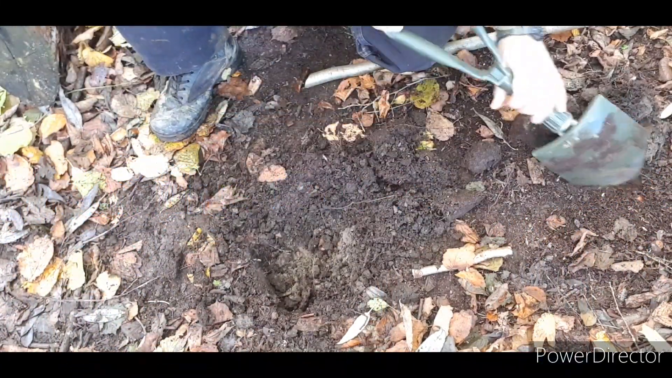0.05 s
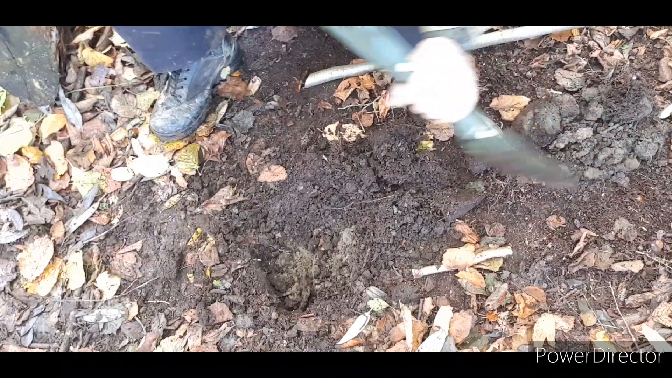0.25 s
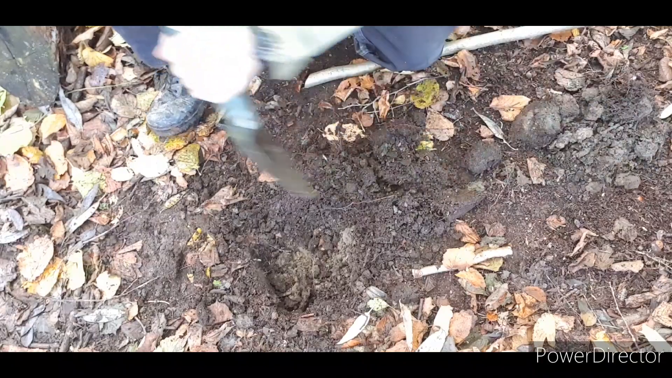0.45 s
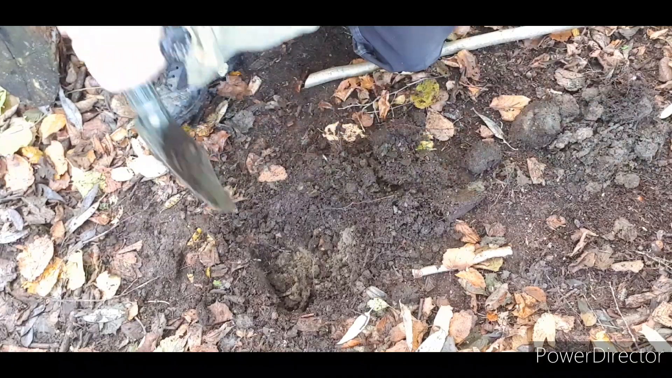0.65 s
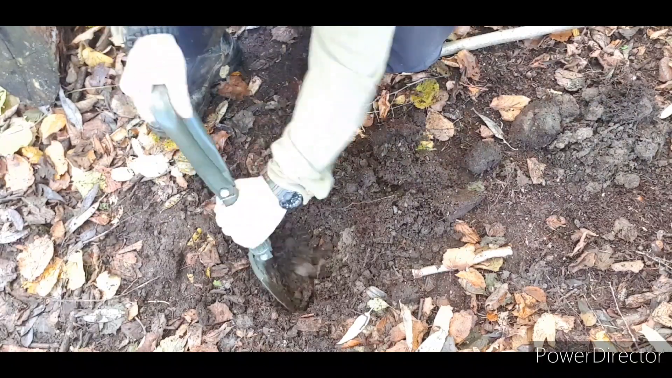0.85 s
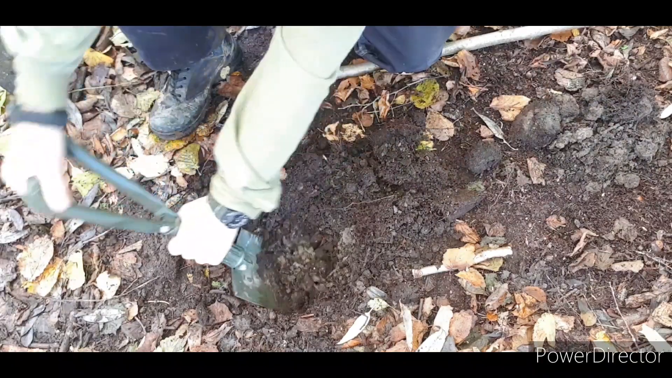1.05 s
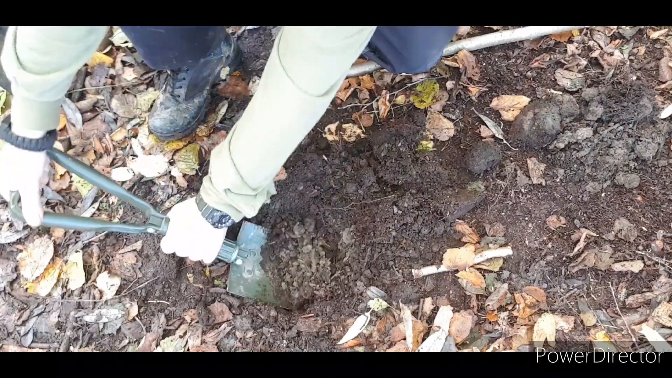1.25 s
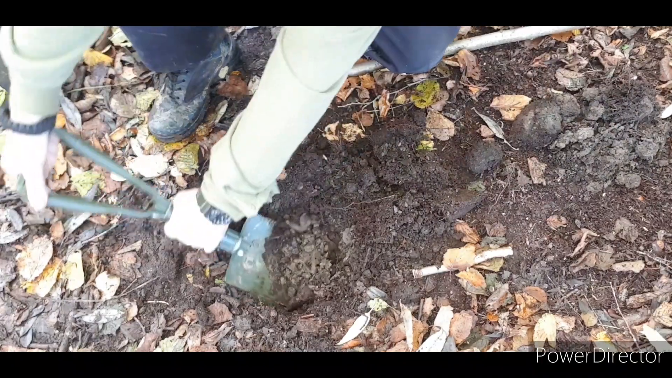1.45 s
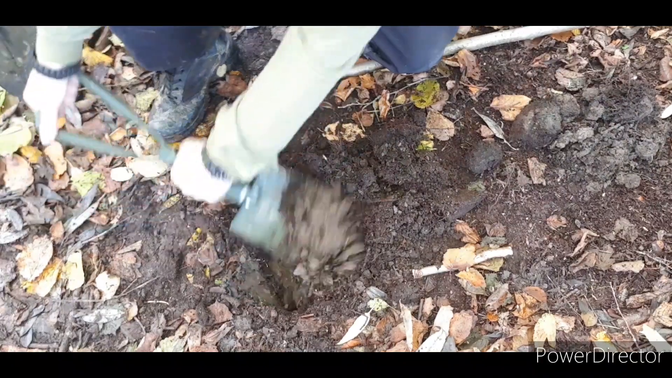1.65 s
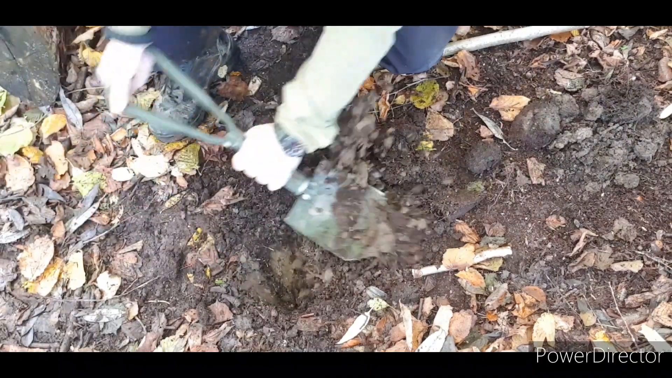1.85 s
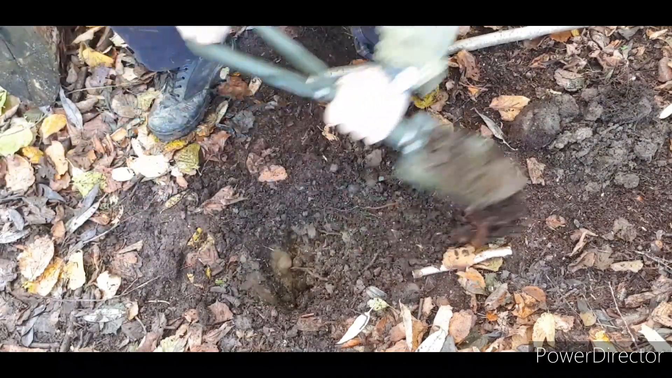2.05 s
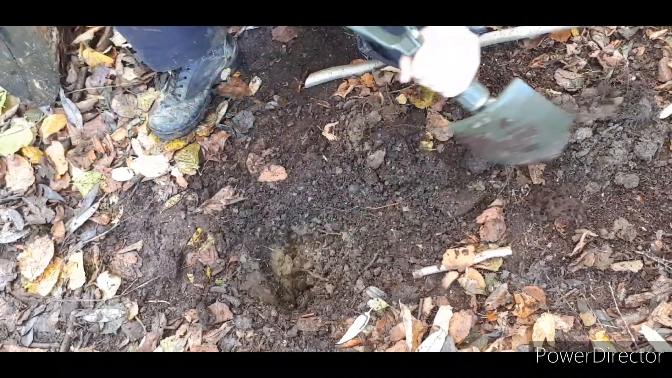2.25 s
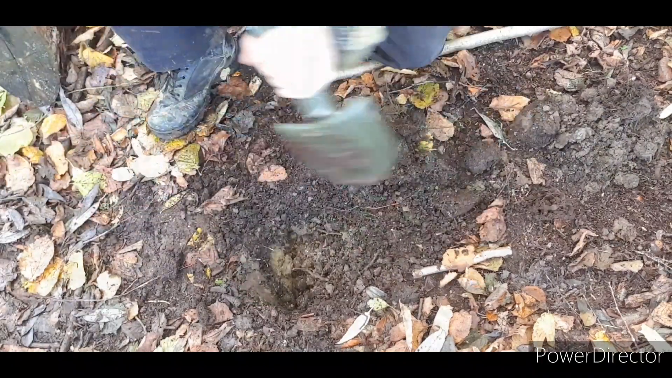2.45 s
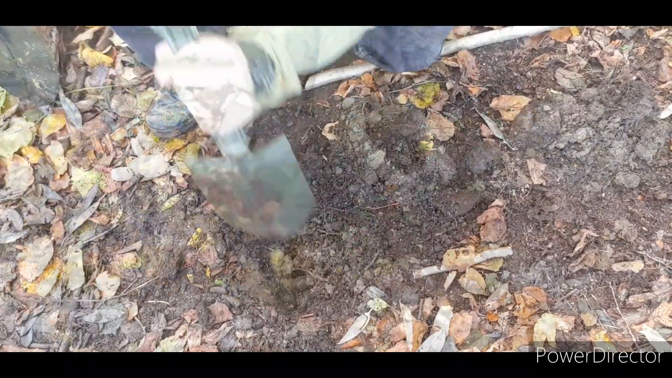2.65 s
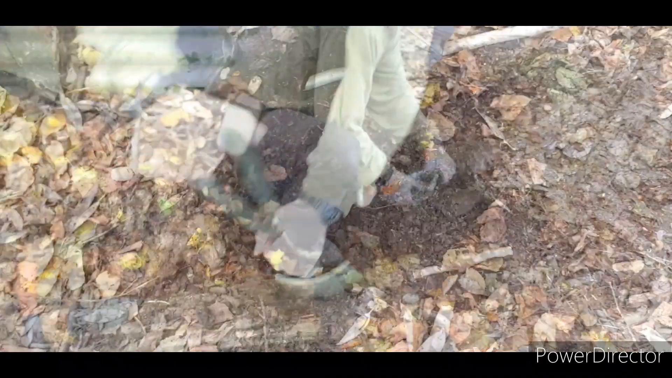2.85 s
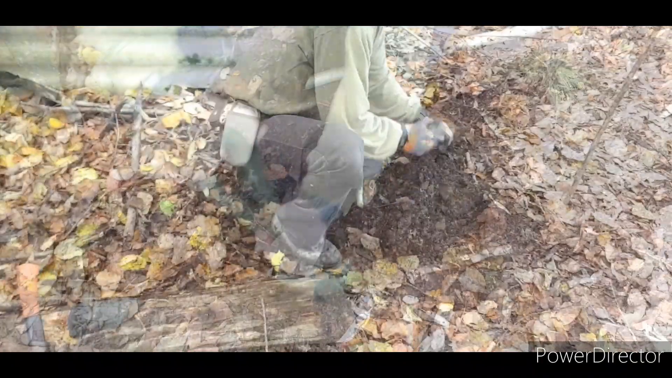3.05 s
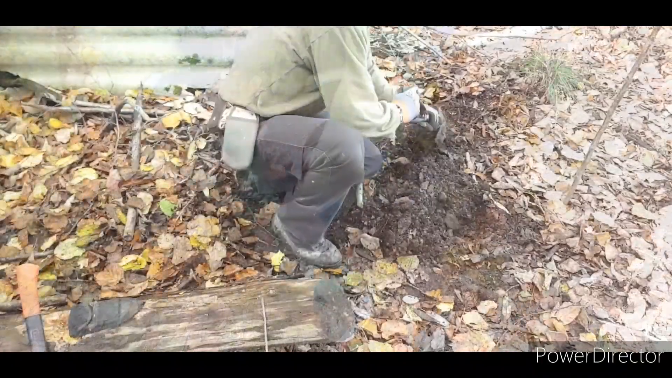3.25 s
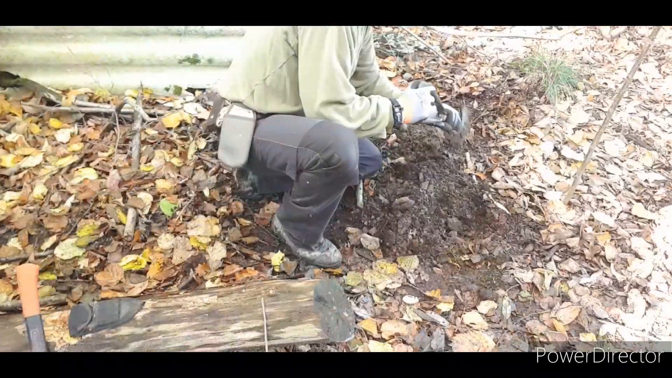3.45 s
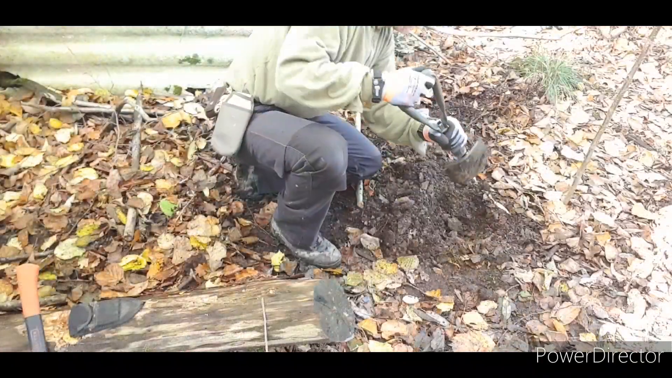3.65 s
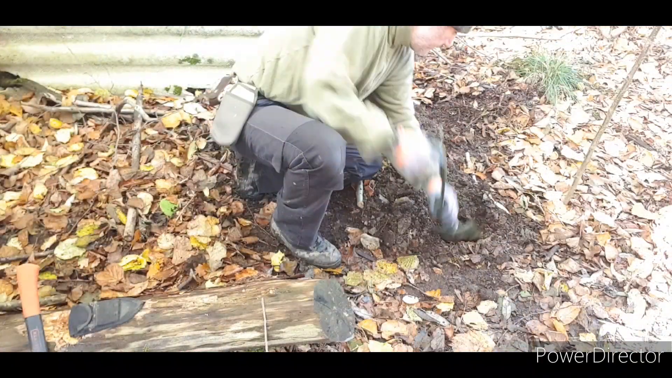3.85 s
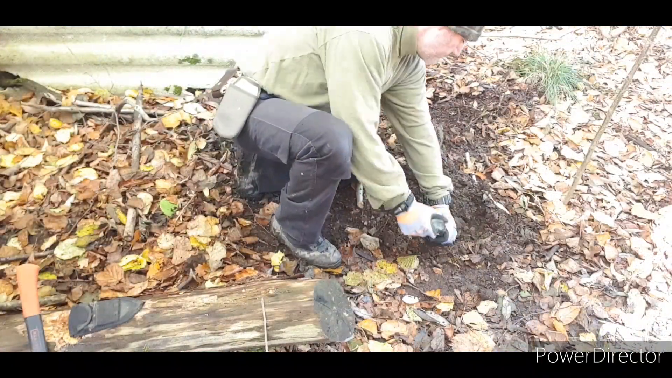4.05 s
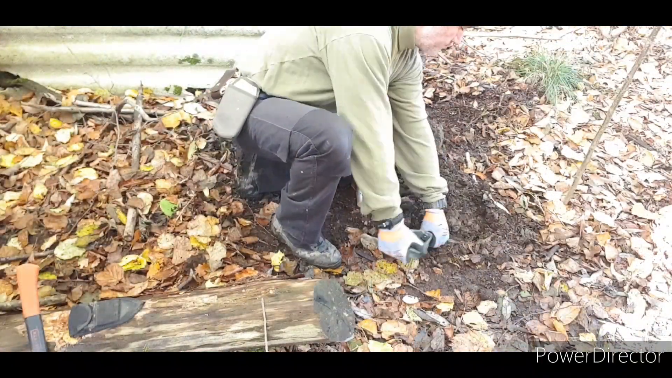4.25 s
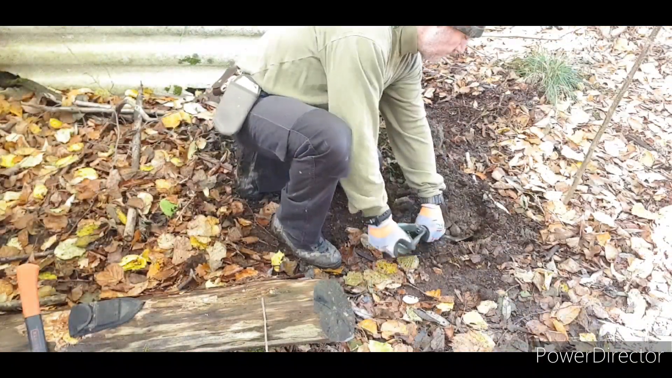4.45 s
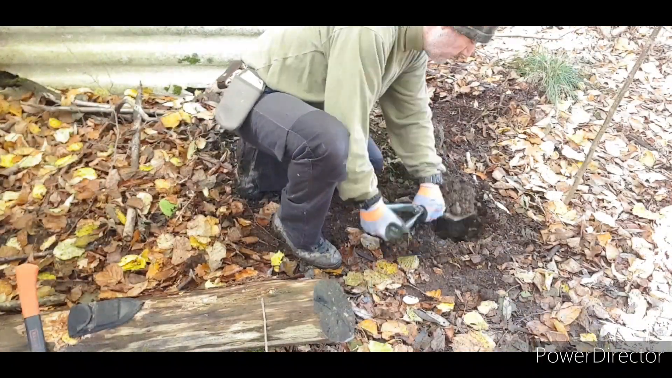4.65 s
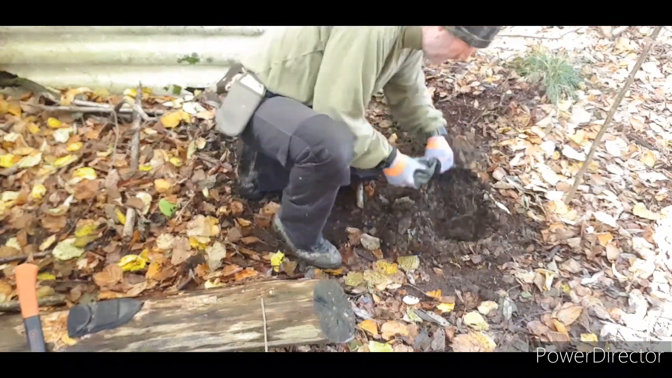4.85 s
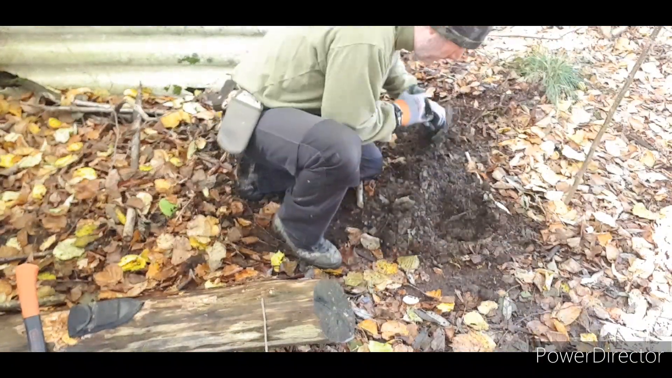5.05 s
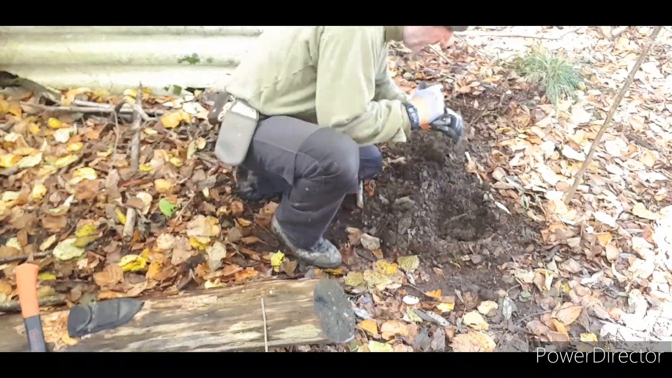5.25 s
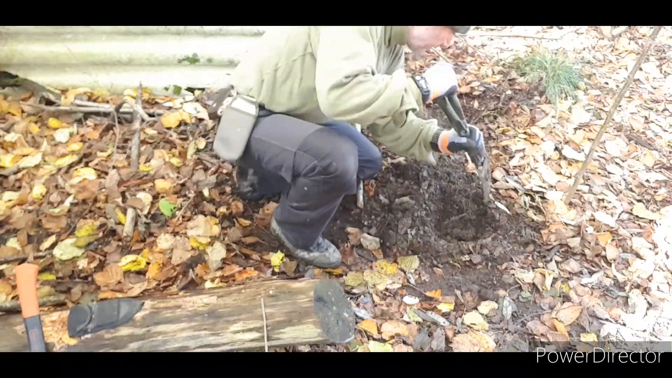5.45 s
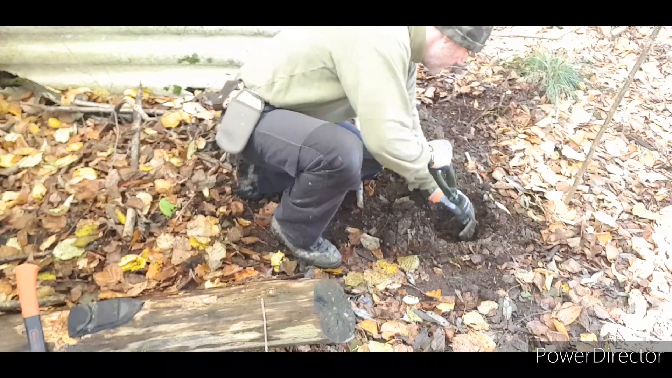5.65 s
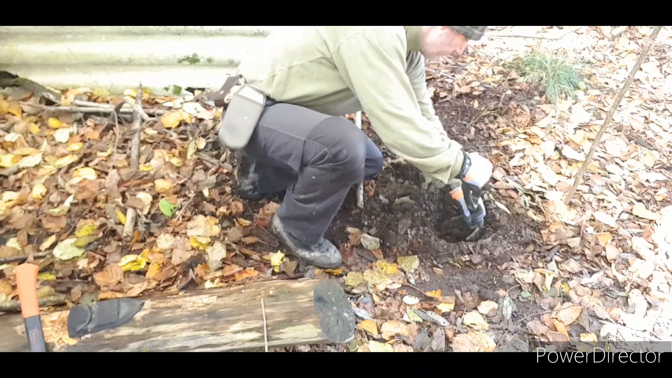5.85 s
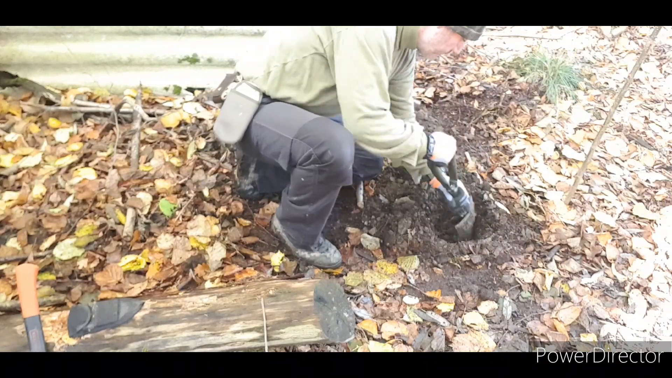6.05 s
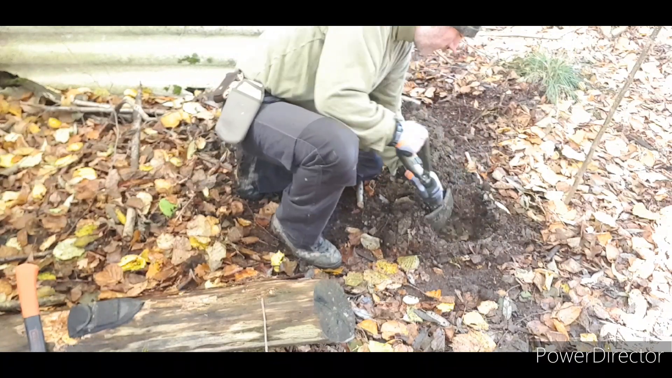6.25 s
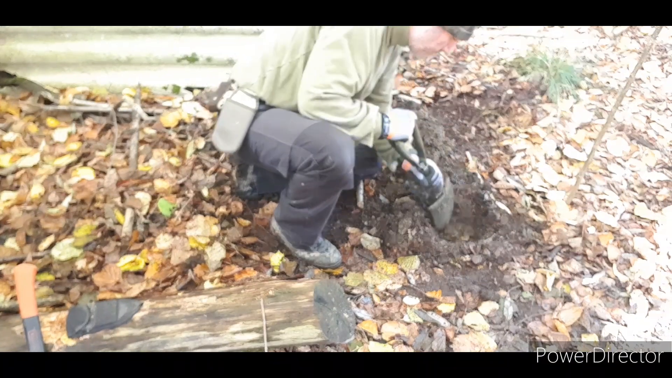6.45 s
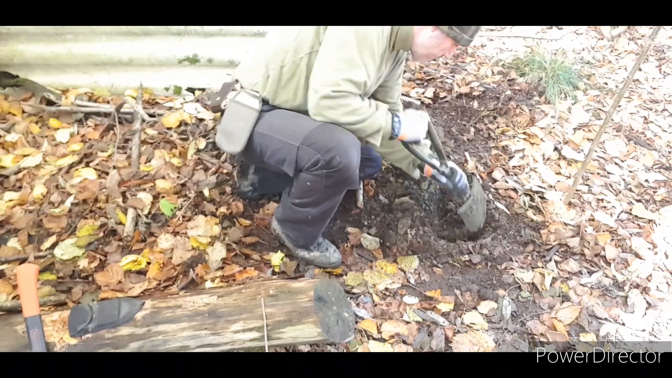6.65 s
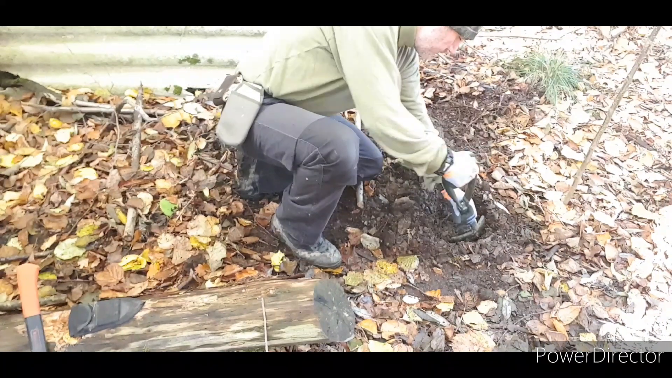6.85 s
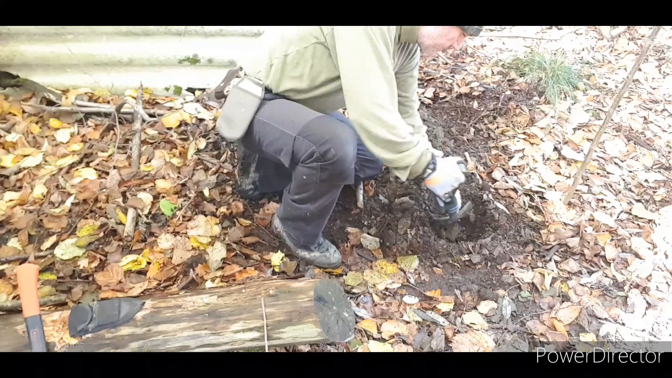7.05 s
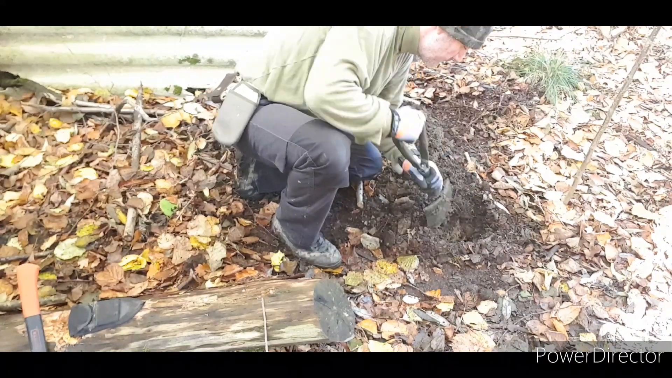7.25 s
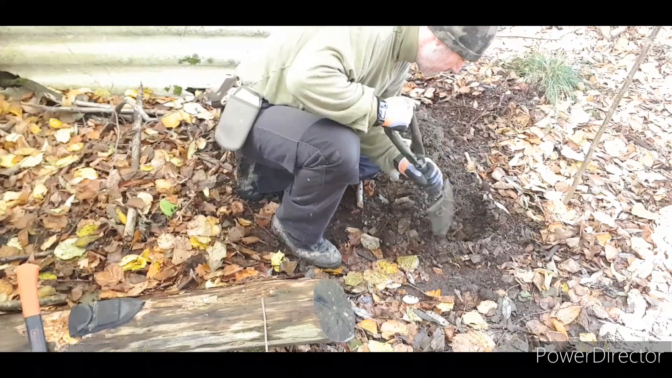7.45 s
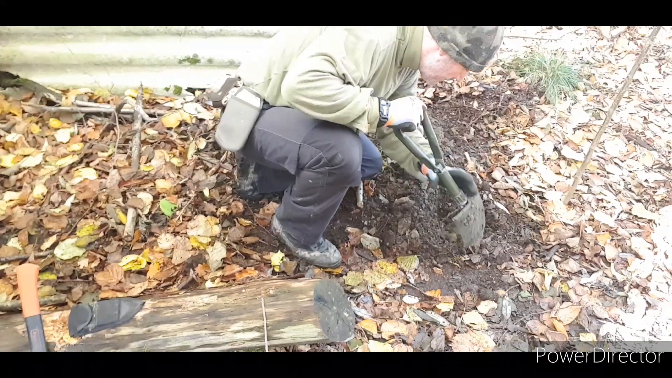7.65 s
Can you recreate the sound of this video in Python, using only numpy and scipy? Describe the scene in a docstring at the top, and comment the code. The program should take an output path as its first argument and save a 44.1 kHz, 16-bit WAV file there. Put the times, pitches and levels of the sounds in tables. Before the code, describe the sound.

A small steel shovel digs wet soil among dead leaves, with gritty scrapes, thuds and two ringing stabs over distant engine hum.

```python
"""A small steel shovel works wet soil among dead leaves. At first it is heard from close above, over
distant engines, far traffic and the hiss of a microphone pair: grit crunches on the dragging blade,
the ground thuds, and at two hard stabs a stone sets the steel ringing. From 3 s on it is heard from a
few steps aside, where the blade sounds hollow. It stabs again at 4 s as the low engine hum swells, then
levers and tips the soil with lighter scrapes and thuds while the hum fades."""
import sys
import numpy as np
from scipy import signal
from scipy.fft import rfft, irfft, next_fast_len
from scipy.io import wavfile
from scipy.ndimage import uniform_filter1d

SR = 44100
rng = np.random.default_rng(int(sys.argv[2]) if len(sys.argv) > 2 else 0)


def master_out(mix):
    """Clip the mix to full scale and print it as 16-bit PCM to the path in sys.argv[1]."""
    frames = np.transpose(np.atleast_2d(mix))
    ceiling = np.clip(frames, -1, 1)
    pcm = np.round(ceiling * 32767).astype(np.int16)
    wavfile.write(sys.argv[1], SR, pcm)


N = 340268
MOVE_S = 3.002  # the microphones jump from the first place to the second
# Spectrum of grit on steel. Each row: frequency in Hz, spectral density in dB.
GRIT_SPECTRUM = [(290, -17.5), (500, -4.5), (728, -9.5), (841, -10.5), (1570, -10), (1860, -8.5),
                 (2000, -8), (3180, -10.5), (6740, -5), (8610, -20.5), (12900, -11), (14900, -19.5),
                 (15800, -32.5)]


def crunches():
    """Brittle fracture: crushed grit gives a snap and a cloud of grains, coloured by a blade resonance."""
    # Each row: start in seconds, level in dB, pan in dB, resonance in Hz, tilt in dB per octave,
    # resonance boost in dB.
    bursts = [(0.0184, -41, -23, 11200, 5.5, 3), (0.134, -26, -17.5, 4300, -1, 17.5),
              (0.832, -48.5, -21, 2700, -3, 12), (0.876, -17.5, -24, 7000, -3, 18),
              (1.022, -45, -20, 2580, 1, 16), (1.0783, -31, -23, 5200, 1, 23),
              (1.089, -44, -21, 1420, 0, 17), (1.1358, -33, -22, 1990, -2, 4),
              (1.1604, -29, -12, 4380, -5, 8), (1.2017, -24.5, -14, 2410, -8, 11),
              (1.272, -48, -12, 3880, -4, 26), (1.7058, -6, -17, 2000, -8, 13),
              (1.7525, -6, -16, 3300, -3, 11), (1.8348, -36.5, -24, 1053, -4.5, -1),
              (1.924, -26.5, -15, 1990, -8, -7), (1.9397, -31.5, -23, 4160, -3.5, 13.5),
              (1.9847, -28, -13, 1130, -11, 19), (2.008, -22.5, -11, 1057, -8.5, 12),
              (2.0415, -42, -12, 1120, -8.5, 17), (2.578, -43.5, -29, 6530, 1, 3),
              (2.834, -46, -26, 3000, -1, 8), (2.8425, -35, -28, 3134, -2, 12),
              (2.8698, -25.5, -15, 1510, 0, 10), (2.8789, -20, -22, 4800, -4, 9),
              (2.8935, -4, -8.5, 800, -8, 6), (2.9204, -9, -13, 2100, -2, 8),
              (3.27, -45.5, -20, 6900, 1.5, 5), (3.9783, -38, 7, 6650, 3, -9),
              (4.0172, -23.5, 17, 1401, 0, 12.5), (4.153, -24.5, -15, 1533, -10, 11),
              (4.962, -33, -12, 1313, 4.5, 43), (5.179, -47, -23, 6020, 4.5, 14),
              (5.2044, -47, -18, 6020, 0, 6), (5.7362, -38, -3, 1021, 7, 5),
              (5.7503, -30.5, -8, 3100, 8, 25), (5.8054, -42, -23, 5844, 8, 1),
              (5.87, -34, -13, 1700, -3.5, 19), (5.9222, -41.5, -23, 6783, -0.5, -2),
              (6.2266, -36, -22, 1513, 2.8, 27), (6.284, -34, -13, 5000, 1.5, 9),
              (6.3116, -38.5, -22.5, 1741, 9, 29), (6.8124, -38, -17.5, 5030, 5, 14),
              (6.833, -32.5, -16, 1530, 0, 8), (6.8671, -38, -13, 7150, 4, 12),
              (7.053, -17.5, 21, 1360, -11, -13), (7.0887, -17.5, -2, 7300, -10.5, 24),
              (7.1069, -23, 2, 7250, 1, 4), (7.329, -46, -12, 5970, -4, 23),
              (7.6468, -50, -17, 5090, -1, 11)]
    out, t = np.zeros((2, N)), np.arange(8192) / SR
    drives = grit_drive((len(bursts), len(t)), per_s=8600, spread_db=0, hiss=0.28)
    for drive, (s, db, pan_db, note_hz, tilt, note_db) in zip(drives, bursts):
        def spectrum_db(hz):
            note = resonance(hz, note_hz, .1 * note_hz, note_db)
            return read(GRIT_SPECTRUM, hz) + tilt * np.log2((hz + 50) / 3000) + note
        t60 = np.interp(db, [-14, -10], [.0423, .0223])  # the hardest bursts end soonest
        envelope = (1 - np.exp(-t / 0.00063)) * gain_of(-60 * t / t60)
        snap = 1.6 * (np.arange(len(t)) == envelope.argmax())
        grains = unit_rms(coloured(drive - snap, spectrum_db))
        add(out, s, gain_of(db - 9) * grains * envelope / envelope.max(), pan_db)
    return out


def thuds():
    """Impact: a push starts as suction and slows as the soil gives, while shovel and ground ring."""
    # Each row: start in seconds, level in dB, push frequency in Hz, its t60 in seconds,
    # relative levels of body ring and deep thump in dB.
    impacts = [(0.8793, -26, 300, 0.03, -2.5, -3), (1.1612, -31, 377, 0.024, -15, -16),
               (1.197, -34, 352, 0.048, -9, -14), (1.7066, -4, 440, 0.012, -15, -18),
               (2.01, -32, 204, 0.017, -2.2, -10.5), (2.873, -33, 200, .027, -14, -7),
               (2.8947, -3, 155, 0.022, -15, -12), (3.972, -36, 250, 0.06, -6, -12),
               (4.0172, -10.5, 387, 0.033, -6, -10.5), (4.03, -19, 430, 0.03, -9, -18),
               (4.052, -25, 420, 0.04, -9, -18), (4.082, -31, 400, 0.04, -6, -18),
               (4.097, -26, 400, 0.045, -6, -18), (4.155, -35, 380, 0.04, -6, -18),
               (4.369, -39, 427, 0.04, -12, -16), (4.699, -40, 363, 0.03, 1.5, -14),
               (5.7343, -23, 165, 0.06, -4, -7), (6.822, -42, 437.8, .02, 6, -12.5),
               (6.875, -35, 360, 0.022, -6, -17), (7.056, -29, 520, 0.04, -9, -16),
               (7.11, -28, 430, 0.05, -6.5, -15)]
    # Modes of shovel and soil. Each row: frequency in Hz, level in dB, nominal t60 in seconds.
    body_modes = [(155, 1.5, 0.058), (179.8, 1, 0.18), (295, 3.5, 0.063), (379.2, 1, 0.1), (447, -2, 0.021),
                  (650, -11.5, 0.012)]
    out, t = np.zeros((2, N)), np.arange(SR // 4) / SR
    body, thump = ringing(body_modes, t60_scale=0.92), ringing([(104, 0, 0.064)], t60_scale=0.83)
    for s, db, hz, t60, ring_db, thump_db in impacts:
        rise_s = np.interp(db, [-30, -20.5], [.003, .0006])  # faint thuds swell, hard ones start at once
        attack = 1 - np.exp(-t / rise_s)
        extra_turns = .18 * (600 / hz - 1)  # the slower the push, the more it hurries at the start
        turns = hz * t + extra_turns * (1 - np.exp(-t / 0.0012))
        push = np.sin(2 * np.pi * turns) * gain_of(-60 * t / t60)
        thud = gain_of(thump_db) * thump - push - gain_of(ring_db) * body
        add(out, s, gain_of(db) * attack * thud, pan_db=15 if s > MOVE_S else -2.4)
    return out


def clinks():
    """Modal excitation: a stone skids over bare steel for a few milliseconds and rings its modes."""
    # Each row: time in seconds, level in dB, pan in dB, factor on t60.
    strikes = [(1.753, -4.5, -9.5, 0.87), (2.9209, -15.5, -2, 0.34)]
    # Mode frequencies of the blade in Hz.
    steel_hz = [660, 1080, 1870, 2067, 2300, 3250, 3400, 4177, 4985, 5819, 6400, 7100, 10610, 11190, 12850,
                13600]
    # The same modes. Each row: level in dB, nominal t60 in seconds.
    steel_decays = [(-6, .012), (-1, .012), (-9, .015), (-5, .028), (-2, .01), (-3, .012), (-3, .012),
                    (-20, .07), (-18, .04), (-11, .03), (-12, .015), (-15, .02), (-9, .044), (-28, .12),
                    (-16, .03), (-9, .012)]
    modes = np.column_stack([steel_hz, steel_decays])
    out, t = np.zeros((2, N)), np.arange(400) / SR
    skids = rng.standard_normal((len(strikes), len(t))) * t * np.exp(-t / 0.0011)
    for skid, (s, db, pan_db, t60_scale) in zip(skids, strikes):
        ring = signal.oaconvolve(ringing(modes, t60_scale), skid)
        add(out, s - .0007, gain_of(db) * ring / abs(ring).max(), pan_db)
    return out


def taps():
    """Impulse response: a pebble on the blade excites a hollow note, one overtone and a click."""
    # Each row: start in seconds, level in dB, note in Hz.
    pebbles = [(1.078, -44, 4900), (1.0897, -41, 1420), (1.162, -39, 4300), (1.2724, -42, 4040),
               (1.924, -43, 1970), (2.0084, -49, 1060), (2.579, -46, 6700), (4.961, -61.5, 1286),
               (5.7501, -39, 3150), (5.87, -48, 1750), (6.2253, -46, 1500), (6.2845, -49, 5084),
               (6.8323, -38, 1573), (7.326, -47, 6060)]
    out = np.zeros((2, N))
    for s, db, hz in pebbles:
        tap = ringing([(hz, 0, .024), (2.3 * hz, -6, .012), (6500, -4, .003)])
        add(out, s, gain_of(db) * tap, pan_db=-32)
    return out


def scrape():
    """Stick-slip friction: the dragged blade makes surging noise, dull in soil and bright in leaves."""
    # Blade resonances heard from the side. Each row: frequency in Hz, boost in dB.
    hollow_notes = [(1550, 8), (3150, 5), (5000, 6), (5950, 4), (7050, 6)]
    # One row for each place: pan of the soil in dB, pan of the leaves in dB.
    pans = [(-11.5, -22), (-9.5, -40)]
    aside = np.arange(N) >= MOVE_S * SR
    soil_pan, leaves_pan = np.transpose(pans)[:, aside.astype(int)]
    soil_level, leaves_level = drag_levels()
    drive = grit_drive((2, N), per_s=2400, spread_db=2.8, hiss=.75)
    drive[0] = .5 * drive[1] + .87 * drive[0]  # the microphones hear partly the same grains
    drive = np.pad(drive, ((0, 0), (0, next_fast_len(N) - N)))
    grit = coloured(drive, lambda hz: read(GRIT_SPECTRUM, hz))
    hollow = coloured(grit, lambda hz: sum(resonance(hz, f, 220, db) for f, db in hollow_notes) - 3)
    grit = np.where(aside, hollow[:, :N], grit[:, :N])
    soil, leaves = (filtered(grit, kind, hz=3500, order=3) for kind in ("low", "high"))
    soil = sides(soil_pan) * soil_level * soil / np.std(soil[1])
    leaves = sides(leaves_pan) * leaves_level * leaves / np.std(leaves[1])
    surge = gain_of(0.43 * wander(rate_hz=60))
    return surge * (soil + leaves)


def drag_levels():
    """Incoherent addition: drags and a steady rustle sum in power, giving soil and leaf amplitudes."""
    # Each row: time of full strength, rise, hold and fall in seconds, then levels of wet soil and of
    # dry crumbs and leaves in dB.
    strokes = [(0.001, 0.009, .02, 0.58, -70.5, -60.5), (0.13, .012, .002, 0.15, -60.5, -69),
               (0.399, 0.15, .12, 0.27, -70, -71), (0.828, 1, .03, 0.024, -85, -70),
               (.878, 0.01, .002, 0.054, -26.5, -29), (0.932, .03, .002, 0.15, -54.5, -57.5),
               (1.03, 0.12, .03, 0.052, -65, -69), (1.094, 0.1, .06, 0.51, -50.5, -51),
               (1.809, 0.54, .002, 0.085, -77, -54), (1.946, 0.18, .2, 0.1, -56, -59),
               (2.172, .03, .002, 0.75, -73, -63.5), (2.459, 0.16, .002, .35, -68.5, -56),
               (2.885, 0.037, 0.013, 0.09, -37, -38.5), (2.932, .03, .002, 0.16, -48.5, -49),
               (3.274, 0.11, .002, 0.19, -66, -65.5), (3.596, 0.33, .002, 0.41, -76.5, -70),
               (4.024, 0.057, .02, 0.13, -42.5, -45.5), (4.135, 0.14, .002, 0.54, -64.5, -74),
               (4.674, 0.19, .24, .1, -70.5, -69), (4.969, 0.033, .002, 0.16, -55, -61),
               (5.181, 0.035, .002, 0.31, -63, -81), (5.45, 0.91, .002, 0.23, -73, -64),
               (5.754, 0.059, .002, 0.16, -52, -52.5), (5.872, 0.009, .002, 0.18, -52, -56.5),
               (6.237, 0.41, .08, 0.16, -60.5, -61), (6.825, 0.041, .04, 0.17, -53, -55),
               (7.077, 0.32, .002, 0.048, -69, -65.5), (7.122, 0.056, .002, 0.089, -41.5, -43),
               (7.342, 0.45, .002, 0.075, -69.5, -62.5), (7.646, 0.018, .07, 0.07, -73, -70)]
    swing_db, rustle_db = 30, (-86, -79.5)  # span of a rise or fall; soil and leaves between drags
    t, power = np.arange(0, N, 16) / SR, 0
    for s, rise, hold, fall, *db in strokes:
        before, after = np.maximum(s - t, 0) / rise, np.maximum(t - s - hold, 0) / fall
        same_place = (t < MOVE_S) == (s < MOVE_S)
        envelope = gain_of(-swing_db * (before + after)) * same_place
        power = power + (gain_of(db)[:, None] * envelope) ** 2
    levels = np.sqrt(power + gain_of(rustle_db)[:, None] ** 2)
    return [np.interp(np.arange(N) / SR, t, row) for row in levels]


def grit_drive(shape, per_s, spread_db, hiss):
    """Shot noise: grains of unequal size strike at random instants over a fine hiss."""
    size = gain_of(spread_db * np.minimum(rng.exponential(1, shape), 5))
    struck = rng.random(shape) < per_s / SR
    return unit_rms(size * struck * rng.standard_normal(shape)) + hiss * rng.standard_normal(shape)


def scattered_tail(x, t60=0.11):
    """Scattering: ground, leaves and trunks return a short dull tail, different at each microphone."""
    t = np.arange(SR // 4) / SR
    tail = rng.standard_normal((2, len(t))) * gain_of(-60 * t / t60) * (t > .003)
    tail = coloured(tail[:, :-1], lambda hz: -2.5 * np.log2(hz / 2000 + 0.21))
    return signal.oaconvolve(x, tail / np.linalg.norm(tail[0]), axes=1)[:, :N]


def engines():
    """Periodic firing: a distant engine gives a harmonic tone that wavers on its way through the air."""
    # Two distant engines: a brief higher hum at the start, and a low hum heard from the first place,
    # then from the second. Each row: time in seconds, firing rate in Hz, level in dB.
    higher_hum = [(0.0, 87.8, -47.5), (0.122, 88.3, -43.5), (0.706, 101.1, -53.5), (0.876, 100, -54.5),
                  (1.05, 100, -53.5)]
    low_hum_first_place = [(0.5, 75.5, -55), (0.68, 65.3, -47), (1.4, 65.65, -46), (1.46, 69.4, -51),
                           (1.81, 64.54, -52.5), (2.2, 75.3, -54.5), (2.74, 65.45, -61),
                           (2.922, 69.7, -36.5), (3.0, 67.3, -48)]
    low_hum_second_place = [(3.0, 68.17, -44), (3.64, 68.1, -44.5), (3.85, 69.4, -50), (4.14, 69.6, -38),
                            (4.43, 73.3, -35.5), (4.84, 74.62, -35.5), (5.1, 77.06, -39),
                            (5.311, 77.9, -42), (5.49, 75.57, -44), (6.29, 74.6, -48), (6.461, 72.33, -47),
                            (6.96, 69.4, -48), (7.16, 66.7, -47), (7.53, 65.9, -59), (7.71, 66, -66)]
    # Each row: multiple of the firing rate, relative level in dB.
    harmonics = [(1, 0), (2, -30), (3, -34.5), (4, -37)]
    # The hum dips briefly. Each row: time in seconds, width in seconds, change in dB.
    dips = [(3.59, 0.019, -10), (5.41, 0.033, -12)]
    out, t = np.zeros((2, N)), np.arange(N) / SR
    dip_db = sum(db * np.exp(-((t - s) / width) ** 2) for s, width, db in dips)
    for course, pan_db in ((higher_hum, 3.1), (low_hum_first_place, 0.1), (low_hum_second_place, 19)):
        hz, db = curves(course)
        turns = np.cumsum(hz * (1 + .003 * wander(rate_hz=8))) / SR
        tone = sum(gain_of(harmonic_db + .8 * k * wander(rate_hz=6)) * np.sin(2 * np.pi * k * turns)
                   for k, harmonic_db in harmonics)
        sounding = uniform_filter1d(((t >= course[0][0]) & (t <= course[-1][0])) * 1., size=200)
        out += sides(pan_db)[:, None] * np.sqrt(2) * gain_of(db + dip_db) * tone * sounding
    return out


def noise_bands():
    """Modulation: slow noise on a carrier makes narrow bands of hiss or hum that swell and fade."""
    # Each row: start and end in seconds, centre and width in Hz, pan in dB, level in dB.
    bands = [(.33, .66, 1550, 160, -14, -70), (.9, 1.12, 7400, 400, -16, -64),
             (4.012, 4.1, 7400, 600, -6, -48.5), (4.66, 4.78, 7000, 150, -14, -70),
             (4.45, 5.3, 1200, 200, -10, -73), (4.62, 5.05, 5100, 400, -14, -77),
             (0, .06, 11200, 200, -16, -65), (1.33, 1.38, 11200, 200, -16, -67),
             (1.715, 1.75, 11150, 200, -16, -62), (2.925, 3, 11200, 200, -14, -60),
             (0, 2.95, 222, 8, -2, -54), (.3, 2.95, 160, 10, -1, -57.5), (5.75, 6.65, 142, 5, 18, -60),
             (3.05, 6.2, 106, 10, 20, -57.5), (3.3, 7.5, 42, 10, 20, -52.5), (7.4, 7.7, 100, 6, 20, -57.5),
             (4.2, 5.4, 680, 300, 0, -69), (4.955, 5.04, 2900, 900, -8, -63)]
    out = np.zeros((2, N))
    for start, end, hz, width, pan_db, db in bands:
        t = np.arange(round((end - start) * SR)) / SR
        pole = np.exp(-np.pi * width / SR)
        real, imag = rng.standard_normal((2, 3 * SR))[:, np.arange(len(t)) % (3 * SR)]
        slow = signal.lfilter([1], [1, -2 * pole, pole * pole], real + 1j * imag)
        band = unit_rms((slow * np.exp(2j * np.pi * hz * t)).real)
        add(out, start, gain_of(db) * band * signal.windows.tukey(len(t), .4), pan_db)
    return out


def air_and_traffic():
    """Superposition: far traffic swells over a steady floor of air noise and microphone hiss."""
    # Traffic, one list for each place. Each row: time in seconds, level in dB.
    traffic_swells = [
        [(0.0, -56), (0.69, -42.5), (1.85, -40), (2.19, -49), (2.84, -64.5), (3.0, -51)],
        [(3.0, -64), (3.83, -75.5), (4.06, -51.5), (5.61, -62), (5.9, -57.5), (6.34, -56.5), (6.57, -75),
         (6.99, -59), (7.42, -72), (7.71, -60)],
    ]
    # Traffic, then the floor at each place. Each row: frequency in Hz, spectral density in dB.
    traffic_spectrum = [(59, -32), (100, -8.5), (214, -3.5), (290, -10.5), (389, -5), (462, -18),
                        (523, -11.5), (851, -40), (1500, -37), (1950, -62), (3300, -120)]
    air_spectra = [
        [(12, -46.5), (20, -9.5), (53, -5), (215, -3), (268, -16), (365, -13), (456, -27.5), (539, -33),
         (713, -33.5), (3500, -36), (6470, -37), (8310, -52.5), (9560, -36), (11600, -28.5), (15800, -30)],
        [(12, -51.5), (20, -14), (48, -17), (74, 7), (95, -12.5), (141, -20), (443, -37.5), (539, -35.5),
         (866, -38.5), (6650, -51), (8090, -67), (9300, -48), (12000, -37.5), (14500, -39), (15800, -37)],
    ]
    # Level of the floor at each place in dB.
    air_db = [-51.5, -49]
    traffic_db, = curves(np.concatenate(traffic_swells))
    air = np.hstack([gain_of(air_db[k]) * noise_field(air_spectra[k], k, patchy_db=0.47) for k in (0, 1)])
    traffic = np.hstack([noise_field(traffic_spectrum, k, patchy_db=4.5) for k in (0, 1)])
    return air + gain_of(traffic_db - 6) * traffic


def noise_field(spectrum, place, patchy_db):
    """Partial coherence: noise with drifting patches is alike at both microphones mainly in the bass."""
    # One list for each place. Each row: frequency in Hz, pan in dB.
    pans = [
        [(60, -3), (110, 2.5), (200, -3.5), (380, -5.5), (700, -4.5), (1290, -0.5), (2380, 2.5), (4400, -9.5),
         (8120, -7), (15000, 9)],
        [(60, 21), (110, 35), (200, 24.5), (380, 0.5), (700, -2), (1290, -5.5), (2380, 3.5), (4400, 1),
         (8120, 4.5), (15000, 7.5)],
    ]
    # One list for each place. Each row: frequency in Hz, correlation of left and right.
    correlations = [
        [(60, 0.92), (180, 0.92), (550, 0.55), (1650, 0.0071), (4970, -0.36), (15000, -0.28)],
        [(60, 1), (180, 0.84), (550, 0.17), (1650, -0.0054), (4970, -0.11), (15000, -0.017)],
    ]
    length = [round(MOVE_S * SR), N - round(MOVE_S * SR)][place]
    frames, hz = length // 512 + 5, np.fft.rfftfreq(2048, 1 / SR)
    left_re, left_im, other_re, other_im, patches = rng.standard_normal((frames, 1025, 5)).T
    patches = unit_rms(uniform_filter1d(uniform_filter1d(patches, size=20, axis=0), size=8, axis=1))
    alike = np.clip(read(correlations[place], hz), -1, 1)[:, None]
    left = left_re + 1j * left_im
    right = alike * left + np.sqrt(1 - alike ** 2) * (other_re + 1j * other_im)
    level = gain_of(read(spectrum, hz)[:, None] + patchy_db * patches)
    spectra = np.array([left, right]) * sides(read(pans[place], hz))[:, :, None] * level
    noise = signal.istft(spectra, nperseg=2048, noverlap=1536)[1][:, :length]
    return noise / np.std(noise.mean(0))


def ringing(modes, t60_scale=1):
    """Free vibration: damped sines summed to peak one; each t60 is scaled, then lengthened by 2 ms."""
    t = np.arange(SR // 4) / SR
    x = sum(gain_of(db - 60 * t / (t60 * t60_scale + .002)) * np.sin(2 * np.pi * hz * t)
            for hz, db, t60 in modes)
    return x / abs(x).max()


def resonance(hz, centre_hz, half_width_hz, boost_db):
    """A bell-shaped resonance peak in dB."""
    return boost_db / (1 + ((hz - centre_hz) / half_width_hz) ** 2)


def wander(rate_hz):
    """Slow sines of random phase sum to a fluctuation of rms one."""
    t = np.arange(0, N, 64) / SR
    slow = sum(np.sin(2 * np.pi * (f * t + rng.random())) for f in np.geomspace(rate_hz / 8, rate_hz, 16))
    return np.interp(np.arange(N) / SR, t, unit_rms(slow))


def gain_of(db):
    return 10 ** (np.asarray(db) / 20)


def unit_rms(x):
    return x / np.sqrt(np.mean(x ** 2) + 1e-20)


def read(points, hz):
    """Interpolation over log frequency."""
    f, value = np.transpose(points)
    return np.interp(np.log(hz + 1), np.log(f + 1), value)


def curves(rows):
    """Columns of a timed table at every sample."""
    s, *columns = np.transpose(rows)
    return [np.interp(np.arange(N) / SR, s, c) for c in columns]


def sides(pan_db):
    """Left and right gains whose mean is one; pan is left minus right level."""
    left = gain_of(pan_db)
    return np.array([2 * left / (1 + left), 2 / (1 + left)])


def add(mix, s, sound, pan_db):
    part = mix[:, round(s * SR):][:, :len(sound)]
    part += sides(pan_db)[:, None] * sound[:part.shape[1]]


def coloured(x, db_of_hz):
    hz = np.fft.rfftfreq(x.shape[-1], 1 / SR)
    return irfft(rfft(x) * gain_of(db_of_hz(hz)), x.shape[-1])


def filtered(x, kind, hz, order):
    return signal.sosfilt(signal.butter(order, hz, kind, fs=SR, output="sos"), x)


def scene():
    """Superposition: the blows, their scattered tails, the scrape and the background add at the pair."""
    blows = crunches() + taps() + clinks()
    blows[0] = np.roll(blows[0], 5)  # the left microphone is farther away
    blows = filtered(blows, "high", hz=450, order=2) + thuds()  # grit and steel carry no bass
    blows = filtered(blows, "high", hz=65, order=2)  # nor does a small blade push the deepest bass
    hum = engines()
    first = np.arange(N) < MOVE_S * SR  # each place hears only its own tails
    tails = np.where(first, scattered_tail(blows * first), scattered_tail(blows * ~first))
    return blows + gain_of(-15) * tails + scrape() + hum + noise_bands() + air_and_traffic()


def record(dry):
    """Clipping caps the peaks, the far microphone is shaded in the treble, and the band is limited."""
    left, right = np.clip(dry, -.92, .92)
    left = signal.lfilter([.75], [1, -.25], left)
    band_limit = signal.firwin(511, cutoff=15750, window=("kaiser", 9), fs=SR)
    return signal.oaconvolve(np.array([left, right]), band_limit[None], "same")


dry = scene()
out = record(dry)
master_out(out)
```